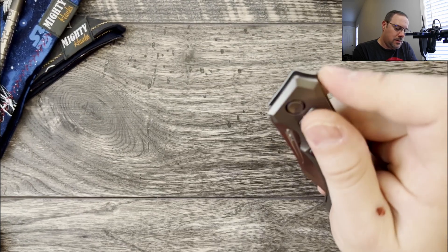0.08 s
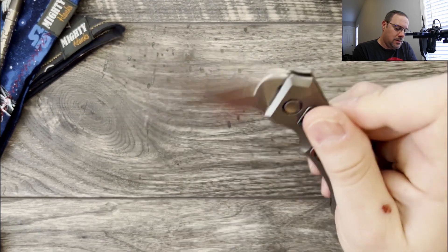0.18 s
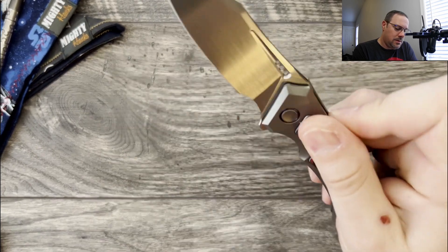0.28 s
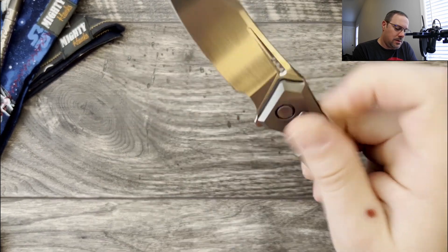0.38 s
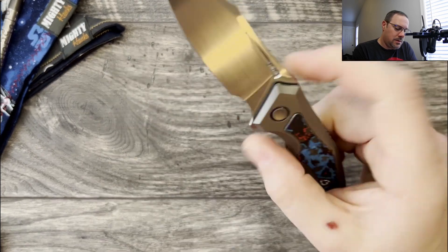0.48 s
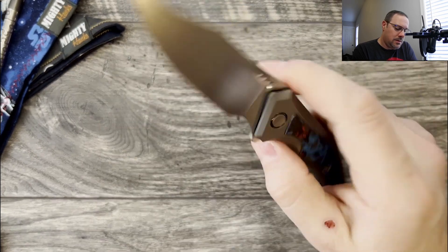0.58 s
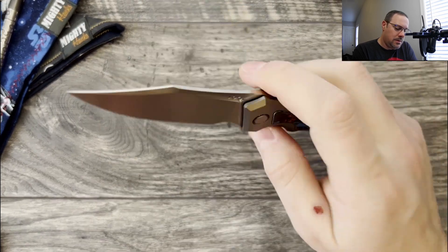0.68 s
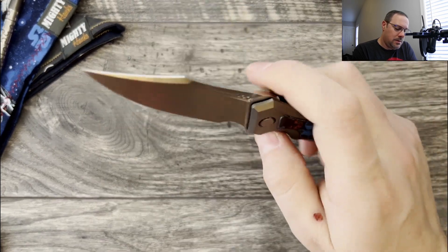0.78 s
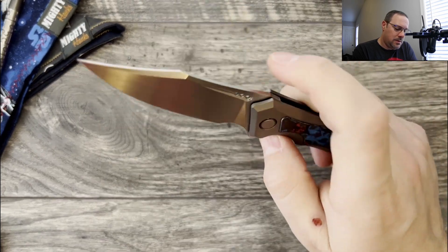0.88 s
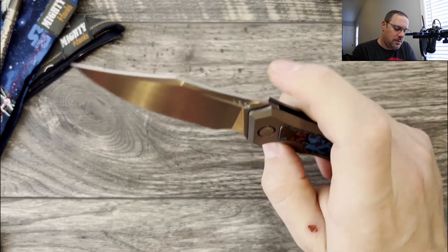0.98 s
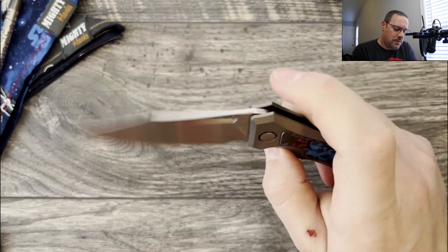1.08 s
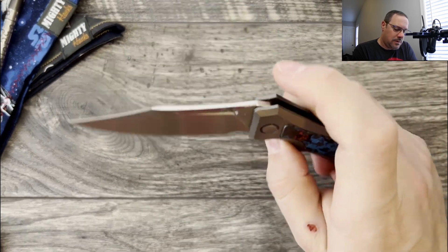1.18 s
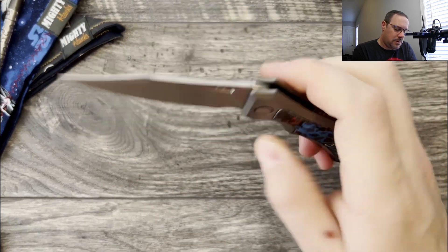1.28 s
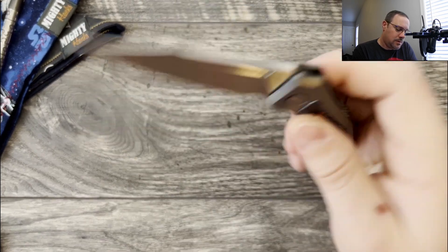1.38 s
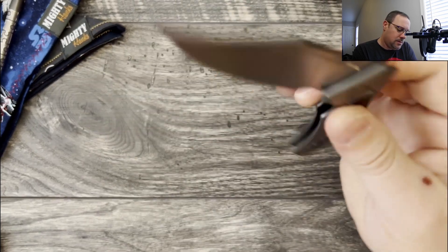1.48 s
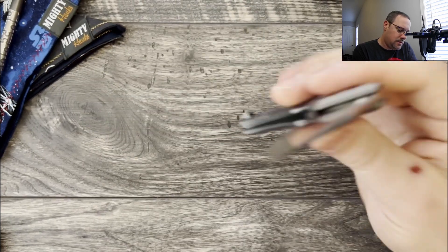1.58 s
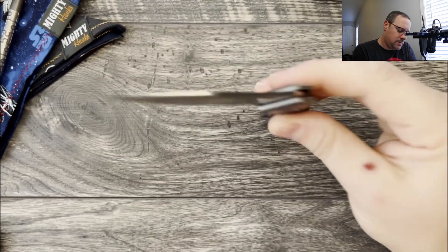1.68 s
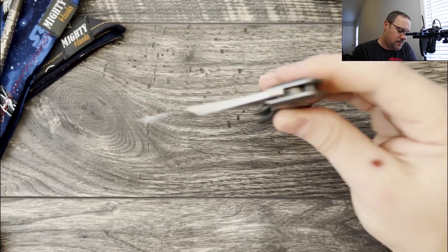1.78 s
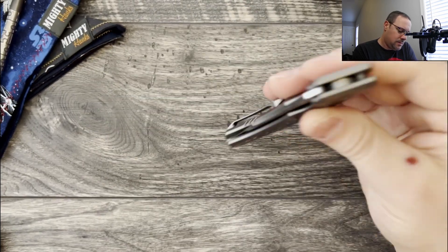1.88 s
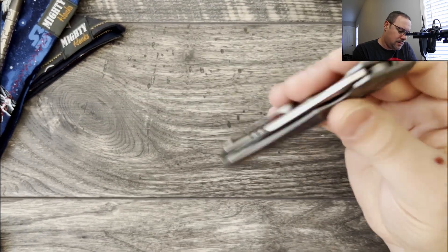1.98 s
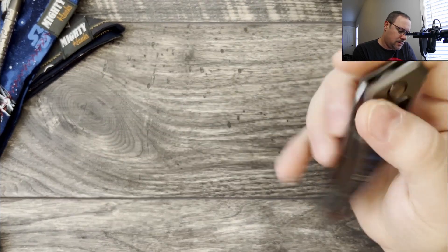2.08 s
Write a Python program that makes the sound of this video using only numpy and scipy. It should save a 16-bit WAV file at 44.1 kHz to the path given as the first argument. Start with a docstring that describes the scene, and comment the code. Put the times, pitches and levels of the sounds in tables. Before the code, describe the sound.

Close stereo sound of a folding knife: brief finger rub, hard steel snap open, a pause, light unlocking ticks, then a softer rattling clack as it closes, with short room echo over faint low hum.

```python
"""A quiet room, where a folding knife is handled close to a stereo microphone.
The blade swings out and locks with a double snap, the lock is released in two ticks,
the blade drops shut and bounces: each hit is a burst of noise that rings the knife's modes.
Fingers brush the handle as swells of grainy noise, and the room answers with a noise echo.
A wavering mains hum and soft, band-by-band air noise lie under it all."""
import sys
import numpy as np
from scipy import signal
from scipy.fft import rfft, irfft, next_fast_len
from scipy.io import wavfile
from scipy.ndimage import uniform_filter1d

SR = 44100
rng = np.random.default_rng(int(sys.argv[2]) if len(sys.argv) > 2 else 0)


def persist_wave(psi):
    """Save psi, clipped to +-1, as 16-bit WAV."""
    counts = np.round(np.clip(psi, -1, 1) * 32767).astype(np.int16)
    wavfile.write(sys.argv[1], SR, np.atleast_2d(counts).T)


N = 94815  # length in samples


def amp(db):
    """Turn decibels into a plain factor."""
    return 10 ** (np.asarray(db) / 20)


def rms_one(x):
    """Scale a sound to an average (rms) strength of 1."""
    return x / np.sqrt(np.mean(x ** 2) + 1e-20)


def at_hz(points, hz, order=1):
    """Read column `order` of a table at any pitch, in straight lines over log frequency."""
    p = np.array(points)
    return np.interp(np.log(hz), np.log(p[:, 0]), p[:, order])


def band(x, low_hz, high_hz):
    """Keep only the sound between two frequencies."""
    edges_hz = [low_hz, min(high_hz, .45 * SR)]
    return signal.sosfilt(signal.butter(2, edges_hz, "band", fs=SR, output="sos"), x)


def ring(force, hz, t60):
    """Strike a mode: a unit click starts a sine of height about 1 that dies 60 dB in t60 seconds."""
    decay, turn = amp(-60 / (t60 * SR)), 2 * np.pi * hz / SR  # both per sample
    return signal.lfilter([0, np.sin(turn)], [1, -2 * decay * np.cos(turn), decay * decay], force)


def pair(mid, side, alike):
    """Mix two noises into left and right: likeness 1 is the same in both, 0 is unrelated."""
    alike = np.clip(alike, -1, 1)
    return np.sqrt(1 + alike) * mid + np.sqrt(1 - alike) * side * [[1], [-1]]


# Colour of the air noise. Each row: frequency in Hz, noise density in dB (relative).
AIR_COLOUR = [(41, -28), (70, 0.5), (86, -28), (250, -23.5), (394, -24), (422, -39), (541, -16),
              (606, -22.5), (1100, -26), (1170, -33.5), (2270, -32.5), (2840, -39.5), (3110, -37.5),
              (4190, -52), (16000, -65)]
# How alike the air noise is in both ears. Each row: frequency in Hz, left-right likeness up to 1.
AIR_LIKENESS = [(60, 0.98), (150, 0.92), (380, 0.67), (950, 0.19), (2380, 0.82), (5980, 0.88),
                (15000, 0.13)]
AIR_DB = -59  # rms level of all bands together


def air():
    """Soft air noise: third-octave bands of stereo noise, each with its level and likeness."""
    settle = 4000  # samples thrown away while the filters start up
    white = rng.standard_normal((2, 2, N + settle))
    out = 0
    for k, low in enumerate(70 * 2 ** np.arange(0, 8, 1 / 3)):
        centre = low * 2 ** (1 / 6)
        mid, side = band(white[k % 2], low, low * 2 ** (1 / 3))[:, settle:]
        out = out + amp(at_hz(AIR_COLOUR, centre)) * pair(mid, side, at_hz(AIR_LIKENESS, centre))
    return amp(AIR_DB) * rms_one(out)


# Path of the mains tone. Each row: time in seconds, pitch in Hz, rms level in dB.
HUM_PATH = [(0.0, 59.4, -51.5), (0.03, 57, -49.5), (0.08, 58.5, -52.5), (0.21, 56.5, -57), (0.23, 58, -46),
            (0.27, 60.34, -59), (0.52, 58.9, -50.5), (0.74, 58.4, -55), (0.99, 58.35, -49),
            (1.07, 59.37, -54.5), (1.28, 58.6, -51.5), (1.31, 60.6, -54.5), (1.39, 59, -52),
            (1.87, 57.3, -52.5), (1.89, 57.2, -47), (1.99, 59.6, -56.5), (2.1, 59.8, -50),
            (2.15, 56.5, -49)]
HUM_NOISE_DB, RUMBLE_DB = -64, -74.5  # rms levels


def hum():
    """A slightly unsteady mains tone, with narrow noise around it and a faint low rumble."""
    s, hz, db = np.transpose(HUM_PATH)
    t = np.arange(N) / SR
    white = rng.standard_normal((2, N + SR))  # the first second lets the filters settle
    phase = 2 * np.pi * np.cumsum(np.interp(t, s, hz)) / SR
    tone = np.sqrt(2) * amp(np.interp(t, s, db)) * np.sin(phase)
    around = amp(HUM_NOISE_DB) * rms_one(band(white[0], 45, 110)[SR:])
    rumble = amp(RUMBLE_DB) * rms_one(band(white[1], 33, 71)[SR:])
    return tone + around + rumble


# Skin and pivot rubbing.
# Each row: start in seconds, length in seconds, level in dB, brightness in dB per octave.
RUBS = [(0.141, 0.059, -47, 3), (0.551, 0.038, -59.5, -1), (0.644, 0.02, -69.5, 1.5),
        (1.207, 0.025, -70, -22.5), (1.329, 0.042, -74.5, 3), (1.369, .03, -68, -2),
        (1.743, 0.22, -67, 4.3), (2.054, 0.12, -67, 8), (2.103, 0.079, -65, 0)]
# The pitches at which the knife rings, shared by rubs and hits: one frequency in Hz per mode.
MODE_HZ = [250, 500, 1000, 1620, 1980, 2300, 3000, 3400, 3850, 4430, 4950, 5400, 6300, 7050, 7300, 7700,
           8750, 9800, 10600, 11000, 12100, 13650, 14900]
# How each of those modes rings, in the same order. Each row: time to die by 60 dB in seconds,
# then relative level in dB when opening, when unlocking, when shutting.
MODE_RING = [(0.057, -34.5, -60, -29.5), (.01, -36.5, -58, -20.5), (0.0094, -39.5, -41, -18.5),
             (0.028, -10, -40, -22), (0.026, -16, -24, -23), (0.012, -12.5, -24, -30.5),
             (.012, -16, -19, -15), (.012, -18.5, -2.5, -19), (0.016, -5, -15, -7.5), (.01, -16, -10, -8),
             (0.013, -18.5, -22, -13), (.014, -2, -30, -10.5), (0.016, -5, -2.5, -10.5),
             (0.0093, -8.5, -7, -5), (.014, -1.5, -8, -14), (.01, -12, -6, -1), (.01, -3.5, 1, -9),
             (0.013, -12, -3, -12), (.012, -7.5, -2, -13), (0.014, -6, -0.5, -4), (.01, -14, -21, -21),
             (0.014, -19.5, -22, -8), (0.013, -15.5, -14, -3.5)]
RUB_RING_SHARE = 0.91  # part heard through the modes; the rest is plain noise
GRIT_DB = 2.0  # average random boost of each noise sample


def rubs():
    """Friction: grainy noise swells up and away, mostly through the knife's modes."""
    t = np.arange(N) / SR
    grit = rng.standard_normal(N) * amp(GRIT_DB * rng.exponential(1, N))
    # The modes die sooner here, and their opening levels count half in dB.
    rung = np.array([rms_one(ring(grit, hz, 0.741 * mode[0])) * amp(.5 * mode[1])
                     for hz, mode in zip(MODE_HZ, MODE_RING)])
    plain = rms_one(band(grit, 3500, 16000))
    octaves = np.log2(np.array(MODE_HZ) / 5000)
    out = 0
    for start, length, db, tilt_db in RUBS:
        swell = np.sin(np.pi * np.clip((t - start) / length, 0, 1)) ** 0.91
        body = rms_one(amp(tilt_db * octaves) @ rung)
        out = out + amp(db) * swell * (RUB_RING_SHARE * body + (1 - RUB_RING_SHARE) * plain)
    return out


# Blade and lock contacts. Each row: start in seconds, level in dB, chatter fade time in seconds,
# brightness in dB per octave, state (0 opening, 1 unlocking, 2 shutting).
HITS = [(.2064, -8, .003, 3, 0), (.2108, -4, .002, -1.5, 0), (.2152, -14, .0015, -1.5, 0),
        (.222, -25, .006, -1.5, 0), (.230, -27, .005, -2.5, 0), (1.0711, -31, .002, -1.5, 1),
        (1.0765, -40, .004, 1.5, 1), (1.097, -52, .003, -4, 1), (1.1094, -27, .0015, 1.5, 1),
        (1.111, -36, .0035, -2.5, 1), (1.8538, -16, .0015, .3, 2), (1.855, -12, .0025, .3, 2),
        (1.8652, -19, .003, -.8, 2), (1.8715, -28, .004, -.8, 2), (2.1098, -43, .002, -3, 2)]
# The noisy crack of a hit: one level per state, in dB against the ringing.
CRACK_DB = [-6.5, -4.5, -6.5]
# Each row, one per state: lower and upper edge of the crack in Hz.
CRACK_HZ = [(2060, 19000), (3540, 15500), (2488, 15000)]
MODE_SPREAD_DB = 0.06  # random level difference of each mode from hit to hit


def knife():
    """Each hit is a dying chatter of steel contacts that rings the modes and cracks."""
    size = 4096  # samples per hit
    t = np.arange(size) / SR
    out = np.zeros(N + size)
    for start, db, chatter_s, tilt_db, state in HITS:
        state = int(round(state))
        chatter = rng.standard_normal((len(MODE_HZ) + 1, size)) * np.exp(-t / max(chatter_s, 1e-4))
        spread = rng.normal(0, MODE_SPREAD_DB, len(MODE_HZ))
        ringing = 0
        for hz, mode, force, extra_db in zip(MODE_HZ, MODE_RING, chatter, spread):
            mode_db = mode[1 + state] + extra_db + tilt_db * np.log2(hz / 5000)
            tone = band(ring(force, hz, mode[0]), hz / 2, hz * 2)
            ringing = ringing + amp(mode_db) * rms_one(tone)
        crack = band(band(chatter[-1], *CRACK_HZ[state]), 900, 14000)
        hit = rms_one(ringing) + amp(CRACK_DB[state]) * rms_one(crack)
        # Level the hit by its strongest 2 ms.
        strongest = np.sqrt(2 * uniform_filter1d(hit ** 2, size=88).max())
        i = int(start * SR)
        out[i:i + size] += amp(db) * hit / strongest / 1.6
    return out[:N]


# Echo of the room. Each row: frequency in Hz, time to die by 60 dB in seconds,
# relative level in dB, left-right likeness up to 1.
ROOM = [(492.5, 0.34, -29.5, 0.59), (1480, 0.78, -27.5, .8), (2500, 0.53, -29.5, .6),
        (4000, 0.6, -23.5, 0.42), (6350, 0.56, -24, .6), (8400, 0.51, -29, 1), (11100, 0.35, -25.5, 0.66),
        (13000, 0.47, -29, .6), (16000, 0.16, -38.5, .6)]
FAR_WALL_S, WALLS_FILL_S = 0.02, 0.036  # when the late echo starts, how long it takes to build
NEAR_DB, NEAR_T60_S = 19, .05  # near echo: level against the late echo, time to die by 60 dB


def room(x):
    """Near surfaces answer at once and briefly; the walls come later and die by band."""
    t = np.arange(SR) / SR
    build = np.clip((t - FAR_WALL_S) / WALLS_FILL_S, 0, 1)
    near = amp(NEAR_DB - 60 * t / NEAR_T60_S) * np.clip(t / 0.0027, 0, 1)  # rises in 2.7 ms
    white = rng.standard_normal((2, 2, SR))
    echo = 0
    for k, low in enumerate(350 * 2 ** np.arange(0, 6, .5)):  # half-octave bands
        centre = low * 2 ** .25
        mid, side = band(white[k % 2], low, low * np.sqrt(2))
        late = build * amp(-60 * (t - FAR_WALL_S) / at_hz(ROOM, centre, order=1))
        level = amp(at_hz(ROOM, centre, order=2) - 22.5)
        echo = echo + level * (late + near) * pair(mid, side, at_hz(ROOM, centre, order=3))
    return signal.fftconvolve(echo, x[None], axes=1)[:, :N]


def scene():
    """The knife and fingers with their echo, over air noise and hum."""
    close = knife() + rubs()
    return close + room(close) + air() + hum()


# The two microphone ports part in phase in the treble.
# Each row: frequency in Hz, how far the right side leads in radians.
PORTS = [(4500, 0.), (5400, .9), (6200, 1.25), (10000, 1.4), (16000, 1.7)]
CUTOFF_HZ = 16600


def record(dry):
    """Two ports hear with a phase offset, half on each side; a steep filter cuts the top."""
    size = next_fast_len(N + 4096)
    hz = np.maximum(np.arange(size // 2 + 1) * SR / size, 1)
    lead = at_hz(PORTS, hz)
    wet = irfft(rfft(dry, size) * np.exp(.5j * lead * [[-1], [1]]), size)[:, :N]
    return signal.sosfilt(signal.cheby2(14, 70, CUTOFF_HZ, fs=SR, output="sos"), wet)


dry = scene()
out = record(dry)
persist_wave(out)
```